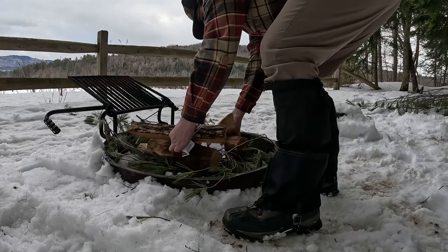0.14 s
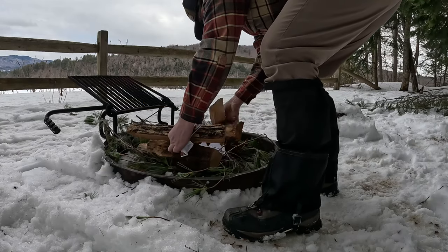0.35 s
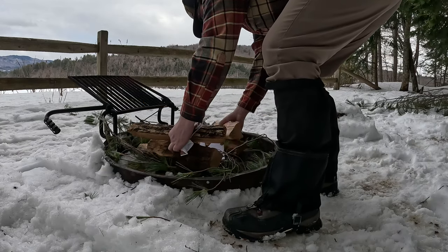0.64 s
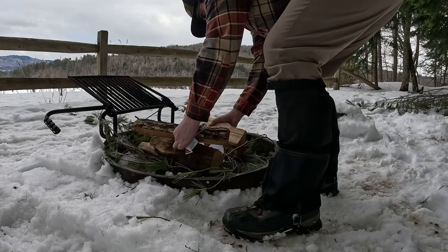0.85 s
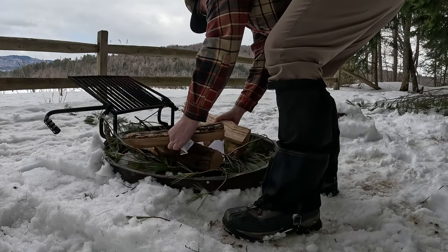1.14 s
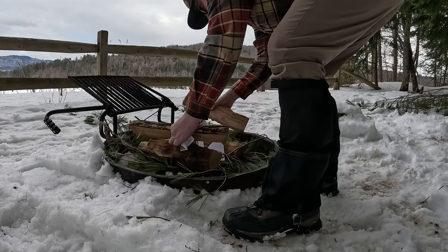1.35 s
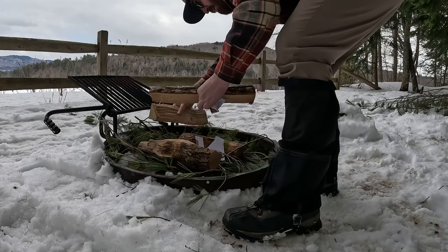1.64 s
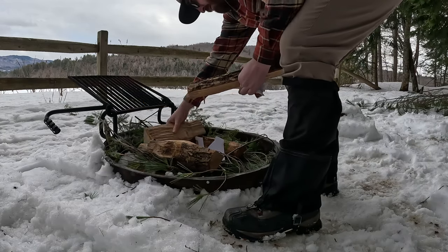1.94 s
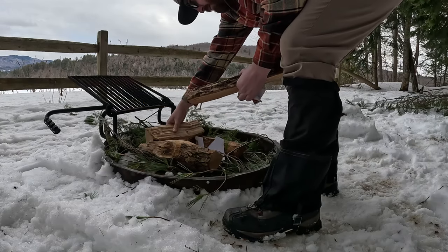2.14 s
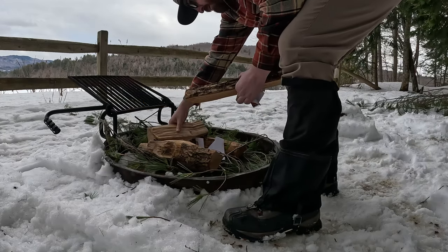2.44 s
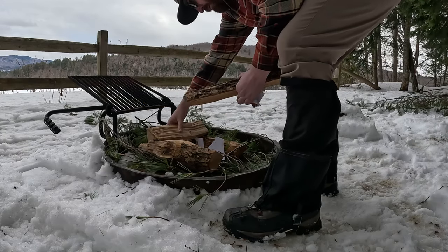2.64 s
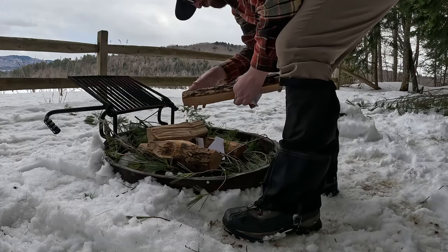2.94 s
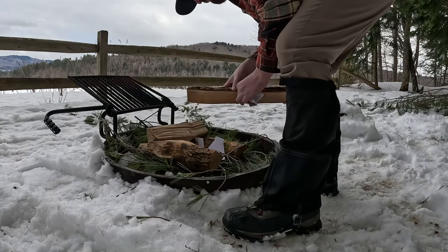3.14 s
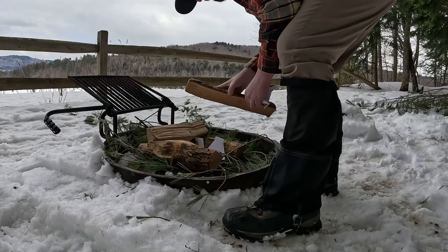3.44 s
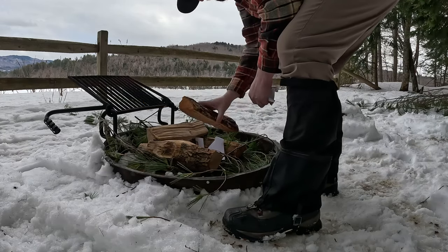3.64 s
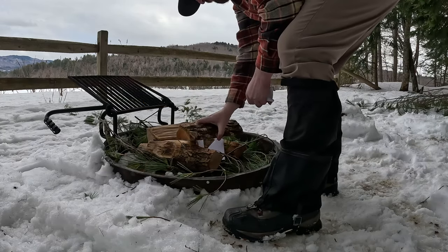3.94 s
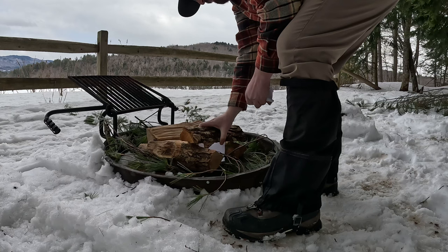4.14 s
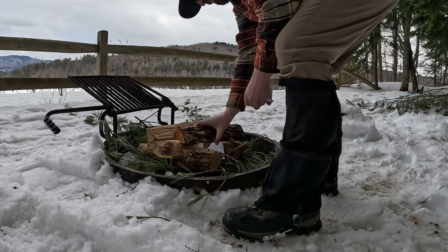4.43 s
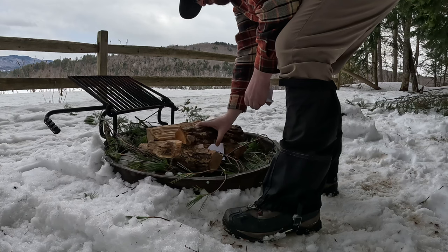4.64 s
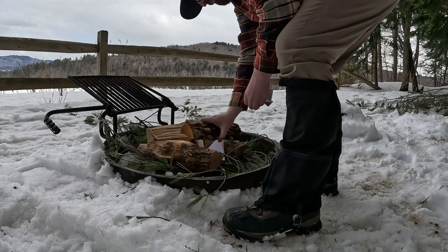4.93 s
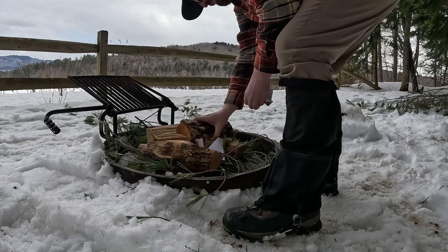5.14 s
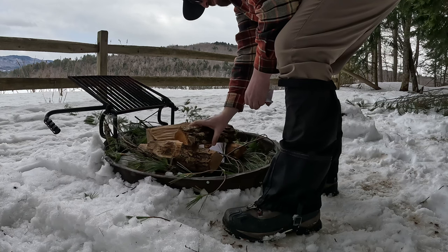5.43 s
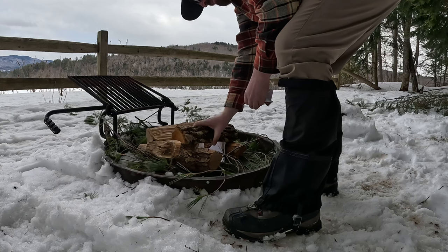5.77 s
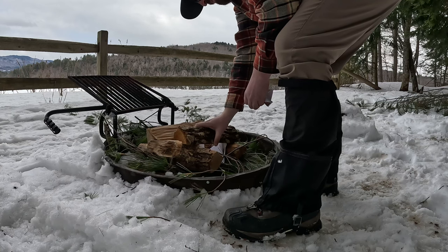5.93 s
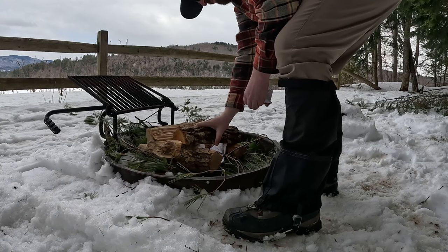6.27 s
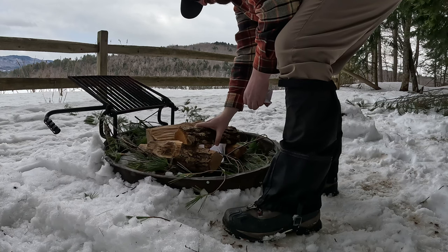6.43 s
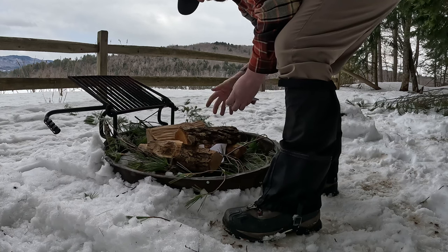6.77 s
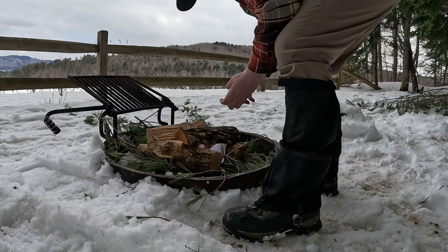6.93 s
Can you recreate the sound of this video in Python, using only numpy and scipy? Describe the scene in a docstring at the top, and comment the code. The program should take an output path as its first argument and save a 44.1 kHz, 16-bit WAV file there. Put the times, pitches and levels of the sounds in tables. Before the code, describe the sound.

Close, dry wooden clacks and bark scrapes as firewood is stacked on rustling fir twigs in quiet winter air, ending with a boot crunching crusted snow.

```python
"""Split logs are laid on a pile of wood and fir twigs in an outdoor fire pit, close to the microphone.
From the start, filtered noise is faint winter air, clicks and noise are rustling twigs and sleeves, and
clicks in short swells are scraping bark. Soon logs knock together (short noise and ringing modes) and
the pile thuds under their weight (low modes). At the end a boot turns in crusted snow: small bursts of
noise and a squeak of clicks. No echo is added."""
import sys
import numpy as np
from scipy import signal
from scipy.fft import rfft, irfft
from scipy.io import wavfile
from scipy.ndimage import uniform_filter1d

SR = 44100
rng = np.random.default_rng(int(sys.argv[2]) if len(sys.argv) > 2 else 0)


def pcm_store(signal):
    """Save signal as 16-bit PCM."""
    levels = np.round(np.clip(np.atleast_2d(signal), -1, 1) * 32767)
    wavfile.write(sys.argv[1], SR, levels.astype(np.int16).T)


N = 313110
TIME = np.arange(N) / SR
HIT_TIME = TIME[:SR // 4]  # a quarter of a second, enough for any single hit

# The ringing modes of a dry split log.
# Each row: pitch in Hz, relative level in dB, time to fade by 60 dB in seconds.
LOG_MODES = [(1140, -24, 0.029), (1742, 11, 0.082), (2110, -24, 0.017), (2338, 22, 0.054),
             (2530, -22, 0.12), (3430, -29, 0.039), (3770, -32, 0.07), (4800, -22, 0.1)]
# The hands push, lift or turn a log.
# Each row: start in seconds, length in seconds, twig rustle in dB, rocking of the pile in dB.
HAND_MOVES = [ (0, 0.038, -41.5, -51), (0.185, 0.042, -47, -52.5), (0.361, 0.073, -42.5, -46),
              (0.568, 0.052, -35.5, -39), (0.763, 0.24, -45, -57), (0.958, .15, -39.5, -43),
              (1.2, 0.48, -52.5, -66.5), (1.944, 0.045, -42.5, -47.5), (2.078, 0.19, -48.5, -55),
              (2.403, 0.072, -44, -53), (3.136, 0.21, -46, -77), (3.356, 0.063, -45.5, -54.5),
              (3.49, 0.12, -44.5, -78), (3.648, 0.11, -51.5, -87), (4.11, 0.52, -50, -57),
              (4.749, 0.21, -45, -54.5), (5.063, 0.35, -53, -81), (5.865, 0.033, -45.5, -47.5),
              (6.08, 0.065, -45, -46), (6.358, 0.065, -49.5, -51), (6.828, 0.14, -43.5, -57.5)]


def undb(db):
    """Turn decibels into gain."""
    return 10 ** (np.asarray(db) / 20)


def unit(x):
    """Scale a sound to rms 1."""
    return x / np.sqrt(np.mean(x ** 2))


def equal_hit(x):
    """Scale a hit to the energy of 4 ms at rms 1, so that short and long hits compare."""
    return x * np.sqrt(.004 * SR / np.sum(x ** 2))


def curve(rows):
    """Draw a gain over time through rows of seconds and dB."""
    return undb(np.interp(TIME, *np.transpose(rows)))


def add(track, s, x):
    """Mix x into the track from second s on, but never before the start of the track."""
    i = max(int(s * SR), 0)
    track[i:i + len(x)] += x[:max(N - i, 0)]


def colour(x, points):
    """Filter a sound to a response given as (Hz, dB) points, without sounding ahead of its input."""
    size = 4096
    hz, db = np.transpose(points)
    bins_hz = np.fft.rfftfreq(size, 1 / SR)
    gain = undb(np.interp(np.log(bins_hz + 1), np.log(hz), db))
    # folding the cepstrum (the spectrum of the log gain) makes the filter act at once
    cepstrum = irfft(np.log(gain))
    cepstrum[1:size // 2] *= 2
    cepstrum[size // 2 + 1:] = 0
    impulse = irfft(np.exp(rfft(cepstrum)))
    return signal.fftconvolve(x, impulse)[:len(x)]


def resonate(x, hz, width_hz):
    """Pass x through one resonance with gain 1 at its centre."""
    return signal.lfilter(*signal.iirpeak(hz, hz / min(width_hz, SR / 4), fs=SR), x)


def grains(count, rate, spread_db):
    """Make tiny clicks at random moments, about rate a second, a few much larger than the rest."""
    chance = rng.random((count, 2))
    sizes = undb(spread_db * np.minimum(-np.log(chance[:, 1]), np.pi))
    happens = chance[:, 0] < rate / SR
    return unit(happens * sizes * rng.choice([-1, 1], count))


def fits(count, rate, depth_db):
    """Make a gain that catches and lets go about rate times a second."""
    hold = int(SR / rate)
    steps = np.repeat(rng.standard_normal(count // hold + 1), hold)[:count]
    smooth = uniform_filter1d(np.clip(steps, -2, 2), hold)
    return unit(undb(depth_db * smooth))


def wood(x, ring_db):
    """Rubbing keeps all the modes of the log sounding, widened by the grip of the hand."""
    modes = sum(resonate(x, hz, 6 / t60) for hz, _, t60 in LOG_MODES)
    return x + undb(ring_db) * modes


def crack(hz, width_hz, t60, snap):
    """A first snap and a quickly dying shower of breaking fibres or crystals, in one resonance."""
    shower = equal_hit(rng.standard_normal(len(HIT_TIME)) * undb(-60 * HIT_TIME / t60))
    first = equal_hit(signal.unit_impulse(len(HIT_TIME)))
    return equal_hit(resonate(shower + snap * first, hz, width_hz))


def ring(modes, gains, detune):
    """Struck modes fade, each at its own rate; each way of holding the wood shifts their pitch a little."""
    hz, db, t60 = np.transpose(modes)[:, :, None]
    hz = hz * (1 + detune * rng.standard_normal(hz.shape))
    fade = np.exp(-np.log(1000) * HIT_TIME / t60)  # falls by 60 dB in t60
    return equal_hit(gains @ (undb(db) * fade * np.sin(2 * np.pi * hz * HIT_TIME)))


def winter_air():
    """Faint air is steady noise, soft in the deep bass and the treble."""
    # Tone of the air. Each row: frequency in Hz, relative level in dB.
    air_tone = [(30, -30), (110, -6.5), (160, -7), (350, -3.5), (600, 1.5), (1100, -3.5), (3500, -14),
                (14000, -47)]
    return undb(-55) * unit(colour(rng.standard_normal(N), air_tone))


def effort(levels_db, settle_db_per_s):
    """Gain over time of all the moves: each builds up, holds while the hand pushes, and settles."""
    build_db_per_s = 160
    gain = np.zeros(N)
    for (s, length, _, _), db in zip(HAND_MOVES, levels_db):
        early = np.maximum(s - TIME, 0)
        late = np.maximum(TIME - s - length, 0)
        move = undb(db - build_db_per_s * early - settle_db_per_s * late)
        gain = np.maximum(gain, move)
    return gain


def rustle():
    """Bark and twigs grind in fits and starts; the logs rock on their bed with the same jerks."""
    # Tone of the twigs. Each row: frequency in Hz, relative level in dB.
    twig_tone = [(300, -17), (800, -6), (1400, 1), (2200, 1), (3400, 0.5), (5000, -2.5), (7000, -10.5),
                 (11000, -16.5)]
    # Tone of the logs rocking on their bed. Each row: frequency in Hz, relative level in dB.
    bed_tone = [(40, -50), (110, -11), (170, 3.5), (280, 4.5), (400, 3), (520, -3), (680, 1.5), (1100, -21),
                (2500, -43.5)]
    jerks = fits(N, rate=49, depth_db=2.5)
    rubbing = grains(N, rate=1500, spread_db=3.5) + 0.96 * rng.standard_normal(N)
    grind = unit(wood(colour(rubbing, twig_tone), ring_db=-14.5))
    # each twig ticks at its own pitch
    ticks = sum(resonate(grains(N, rate=22, spread_db=4), hz, 170) for hz in np.geomspace(1300, 4600, 14))
    twigs = unit(grind + .9 * unit(colour(ticks, twig_tone)))
    bed = unit(colour(grains(N, rate=160, spread_db=1.0), bed_tone))
    _, _, twigs_db, rocking_db = np.transpose(HAND_MOVES)
    # a resting hand still stirs the twigs a little
    stir = np.hypot(effort(twigs_db, settle_db_per_s=105), undb(-64))
    rocking = effort(rocking_db, settle_db_per_s=127)
    return jerks * (stir * twigs + rocking * bed)


def sleeves():
    """Cloth on cloth gives a smooth, wide swish that swells with the speed of the arm."""
    # Flannel sleeves slide as an arm swings.
    # Each row: middle in seconds, level in dB, spread to each side (standard deviation) in seconds.
    swing_rows = [(.3, -51.5, 0.41), (1.828, -48.5, 0.2), (3.385, -62.5, 0.72), (6, -72, .2),
                  (6.98, -50, 0.2)]
    cloth_tone = [(200, -8), (900, -5.0), (2500, 4.5), (6500, -4.5), (12000, -13.5)]
    swings = sum(undb(db) * np.exp(-.5 * ((TIME - s) / spread) ** 2) for s, db, spread in swing_rows)
    rest = undb(-63.5)  # the cloth is never quite still
    return np.hypot(swings, rest) * unit(colour(rng.standard_normal(N), cloth_tone))


def scrapes():
    """Rough bark catches and slips in short swells of clicks that sound the log."""
    # Bark slides on bark. Each row: middle in seconds, level in dB before the final tone filter,
    # length in seconds between the half-height points of the swell.
    scrape_rows = [ (0.01, -36, 0.036), (0.336, -34, 0.021), (0.384, -29.5, 0.02), (0.518, -33, 0.025),
                   (0.576, -31.5, 0.028), (0.652, -29.5, 0.03), (0.999, -27, 0.039), (1.081, -39.5, 0.077),
                   (1.157, -29.5, .029), (1.948, -31, 0.041), (3.151, -39.5, 0.027), (3.336, -26.5, 0.021),
                   (3.41, -34, 0.028), (3.946, -33, 0.025), (4.539, -40, 0.015), (4.924, -42, 0.035),
                   (5.821, -40, 0.037), (5.93, -40, 0.044), (6.08, -35, 0.025), (6.108, -27.5, 0.018),
                   (6.202, -36, 0.034), (6.42, -40.5, 0.041)]
    # quicker strokes are brighter: the pitch of a usual stroke, and its fall for each doubling of length
    usual_hz, usual_s, fall_octaves = 2860, 0.027, 0.39
    out = np.zeros(N)
    for s, db, length in scrape_rows:
        hz = usual_hz * (usual_s / length) ** fall_octaves
        swell = np.hanning(int(2 * length * SR))
        clicks = grains(len(swell), rate=2200, spread_db=2.5)
        clicks = clicks * fits(len(swell), rate=199.4, depth_db=0.5)
        bark = unit(wood(resonate(clicks, hz, 0.49 * hz), ring_db=-2.5))
        add(out, s - length, undb(db) * swell * bark)
    return colour(out, [(150, 23.5), (1000, 1.5), (4000, -2.0), (12000, -7.0)])


def graze(hz, width_hz, rise_s):
    """Fibres crush ever harder just before the contact gives way."""
    growth = np.exp(-HIT_TIME[::-1] / rise_s)
    return equal_hit(resonate(rng.standard_normal(len(HIT_TIME)) * growth, hz, width_hz))


def pitches(x, hz, count, ring_db):
    """Every spot struck has a few short resonances of its own, scattered around its centre pitch."""
    span_octaves, width_hz = 1.257, 110  # range of the resonances, and the width of each
    places = (np.arange(count) + rng.random(count)) / count
    centres = np.clip(hz * 2 ** (span_octaves * (places - .5)), 100, SR / 3)
    spots = sum(resonate(x, f, width_hz) for f in centres)
    return equal_hit(x + undb(ring_db) * spots)


def knocks():
    """Each contact grazes, cracks, rings the log if it is held loosely, and shakes loose bark after it."""
    # Wood meets wood, or a twig snaps. Each row: time in seconds, level in dB before the final tone filter,
    # centre in Hz, width in Hz.
    knock_rows = [ (0.123, -34, 4970, 3000), (.364, -25.5, 2860, 2000), (.392, -21.5, 2440, 1620),
                  (.417, -25.5, 2310, 1800), (0.535, -16, 1820, 1500), (.5555, -19, 2650, 1400),
                  (.5615, -28, 2650, 1400), (0.599, -16.5, 2790, 1920), (0.628, -19, 2460, 1290),
                  (.746, -33.5, 3100, 2000), (.941, -26.5, 2120, 1800), (0.9699, -24, 2360, 2000),
                  (0.9896, -17.5, 2120, 700), (1.099, -28.5, 2560, 1600), (1.144, -24, 2640, 1300),
                  (1.152, -22.5, 3360, 5000), (1.209, -29.5, 1610, 1390), (1.9306, -13, 3360, 2500),
                  (1.9547, -22.5, 2060, 1500), (2.119, -23.5, 4330, 450), (2.1273, -18, 2260, 600),
                  (2.162, -20.5, 4640, 6240), (2.23, -29.5, 2900, 4020), (2.255, -31.5, 3960, 2500),
                  (2.275, -35, 1880, 1200), (2.478, -11.5, 1950, 1700), (3.177, -26, 2830, 3000),
                  (3.3355, -16.5, 3160, 1270), (3.3405, -13.5, 3150, 1370), (3.398, -26, 2340, 1400),
                  (3.408, -26, 3260, 1600), (3.436, -16.5, 5940, 8900), (3.965, -14.5, 2500, 550),
                  (4.089, -31.5, 2140, 1800), (4.154, -30.5, 1230, 1100), (4.287, -32, 2560, 1500),
                  (4.421, -34, 3080, 2200), (4.92, -29, 1630, 1300), (5.255, -23.5, 1760, 1620),
                  (5.264, -28.5, 2380, 1200), (6.101, -28, 3700, 4000), (6.345, -37, 2600, 2000),
                  (6.3678, -26, 2130, 696), (6.394, -22, 2350, 2190), (6.613, -37, 1920, 2000),
                  (6.7173, -22, 4900, 3000), (6.814, -25, 3240, 3000)]
    # How freely the struck log rings, most when it dangles by one end.
    # Each row: time in seconds, level of the ring against the crack in dB.
    freedom = [(1.2, -1.5), (1.93, -3.5), (2.12, -2), (2.28, 2), (2.45, -31), (7, -14)]
    # a firm blow cracks briefly, a light touch chatters on:
    # cycles the crack lasts at the firm level, and the drop in level that doubles it
    crack_cycles, firm_db, doubling_db = 27.3, -17, 5
    out = np.zeros(N)
    for s, db, hz, width_hz in knock_rows:
        t60 = crack_cycles / hz * 2 ** ((firm_db - db) / doubling_db)
        snap = pitches(crack(hz, width_hz, t60, snap=0.52), hz, count=5, ring_db=-2)
        mode_gains = undb(2.5 * rng.standard_normal(len(LOG_MODES)))
        looseness = undb(np.interp(s, *np.transpose(freedom)))
        body = looseness * ring(LOG_MODES, mode_gains, detune=.003)
        chatter = crack(hz, 3900, t60=0.11, snap=0) * fits(len(HIT_TIME), rate=250, depth_db=4.5)
        shaken = equal_hit(wood(chatter, ring_db=1))
        # the graze ends where the knock begins, if there is room for it
        add(out, s - HIT_TIME[-1], undb(db - 15) * graze(hz, width_hz, rise_s=.005))
        add(out, s, undb(db) * (snap + body + undb(-13.5) * shaken))
    return colour(out, [(60, -5), (200, -3.5), (600, -12), (1000, -1.5), (2600, -3), (4000, -1.5),
                        (5500, -6.5), (8000, -10.0), (12000, -7.0)])


def thuds():
    """Soft, heavy contacts wake the low modes of the pile, harder ones the higher modes."""
    # Weight lands on the pile.
    # Each row: time in seconds, level in dB before the final tone filter, centre in Hz.
    thud_rows = [ (.192, -42, 270), (.392, -34, 325), (.511, -26, 362), (0.532, -20, 890), (.5984, -9, 650),
                 (0.5992, -12.5, 390), (.631, -27, 310), (.644, -22.5, 340), (0.667, -32, 360),
                 (.991, -36, 400), (1.018, -30.5, 330), (1.152, -35.5, 264), (1.208, -39, 272),
                 (1.933, -26, 284), (1.958, -35, 235), (2.145, -37, 270), (2.401, -28, 264),
                 (2.478, -19.5, 990), (2.497, -29, 300), (4.089, -23, 353), (4.152, -32, 740),
                 (4.154, -34, 229), (4.256, -36.5, 260), (4.372, -36, 278), (4.472, -38.5, 270),
                 (4.551, -37, 300), (4.582, -35, 250), (4.936, -42, 266), (5.255, -22, 344),
                 (5.2823, -14, 813), (5.285, -24.5, 300), (5.299, -21.5, 780), (5.311, -29, 227),
                 (5.877, -29.5, 840), (5.882, -29.5, 249), (6.395, -36, 283), (6.616, -31.5, 250)]
    # The ringing modes of the loaded pile in its steel bowl.
    # Each row: pitch in Hz, relative level in dB, time to fade by 60 dB in seconds.
    pile_modes = [(185, -9, 0.062), (242, 6, 0.028), (305, -1.5, 0.043), (342.4, 1, 0.041), (490, 3, 0.045),
                  (583, 4, 0.043), (635, 4.5, 0.051), (834, -26, 0.0055), (1055, 14.5, 0.056),
                  (1160, -30, .04), (1295, 24.5, 0.07)]
    # reach of a landing into the modes below and above its centre
    below_octaves, above_octaves = 0.41, .25
    out = np.zeros(N)
    octaves = np.log2(np.array(pile_modes)[:, 0])
    for s, db, hz in thud_rows:
        away = octaves - np.log2(hz)
        reach = np.where(away < 0, below_octaves, above_octaves)
        weights = np.exp(-.5 * (away / reach) ** 2)
        # modes move the struck point in or out
        signs = np.where(octaves < np.log2(500), 1, -1)
        clatter = equal_hit(resonate(crack(hz, 0.66 * hz, t60=0.087, snap=0), hz, 1.43 * hz))
        # the softer the contact, the longer the weight takes to bear
        bearing = 1 - np.exp(-HIT_TIME * hz / .5)
        landing = ring(pile_modes, signs * weights, detune=0.007) + undb(-7.0) * clatter
        add(out, s, undb(db) * equal_hit(bearing * landing))
    return colour(out, [(40, -5), (110, -8), (170, -2.5), (280, 0.0), (1400, -4), (3000, 4.5), (8000, 4)])


def boot():
    """The snow crust gives way in bright little collapses with hardly any bass."""
    # Snow crust breaks under the boot. Each row: time in seconds, level in dB before the final tone
    # filter, centre in Hz, width in Hz, time for the shower to fade by 60 dB in seconds.
    crunch_rows = [(6.9078, -30.5, 2500, 1600, 0.012), (6.914, -28.5, 1870, 1400, 0.018),
                   (6.921, -28.5, 2800, 2200, 0.069), (6.9478, -20, 2070, 880, 0.014),
                   (6.986, -25, 2730, 2000, 0.28), (7.0117, -25, 2570, 1800, 0.03),
                   (7.02, -25.5, 1320, 400, 0.023), (7.03, -27, 1890, 1400, 0.23)]
    out = np.zeros(N)
    for s, db, hz, width_hz, t60 in crunch_rows:
        add(out, s, undb(db) * crack(hz, width_hz, t60, snap=0.22))
    # grains squeak on as the sole keeps pressing
    pressure = curve([(6.75, -81), (6.88, -58), (6.97, -44), (7.02, -37), (7.065, -46), (7.1, -35)])
    out += pressure * unit(resonate(grains(N, rate=1800, spread_db=2.5), 1860, 1200))
    return colour(out, [(300, -33), (800, -13.5), (1150, 3), (3800, 0.0), (6000, -2.5), (12000, -14)])


def scene():
    """Everything happens straight ahead, so both sides hear the same."""
    mix = winter_air() + rustle() + sleeves() + scrapes() + knocks() + thuds() + boot()
    return np.tile(mix, (2, 1))


def record(dry):
    """The microphone thins the bass and notches the treble; its two ports differ mainly at the very top."""
    # Response of the microphone. Each row: frequency in Hz, gain in dB.
    mic_response = [(30, -14), (105, -19), (165, -0.5), (7200, 0), (11000, -1.5), (13300, -16.5),
                    (14300, -33)]
    heard = colour(dry.mean(axis=0), mic_response)
    heard = heard - resonate(heard, 9050, 2300)  # the notch
    top = colour(heard, [(3500, -59), (7000, -26.5), (10000, -21), (13000, -3)])
    side = np.pad(top, (24, 0))[:N]  # 24 samples late
    # nearly nothing passes above 15700 Hz
    low_pass = signal.ellip(8, .2, 70, 15700, fs=SR, output="sos")
    return signal.sosfilt(low_pass, [heard - side, heard + side])


dry = scene()
out = record(dry)
pcm_store(out)
```